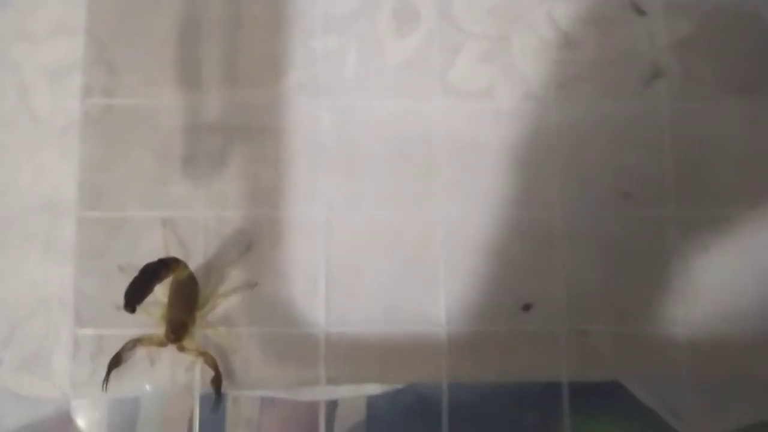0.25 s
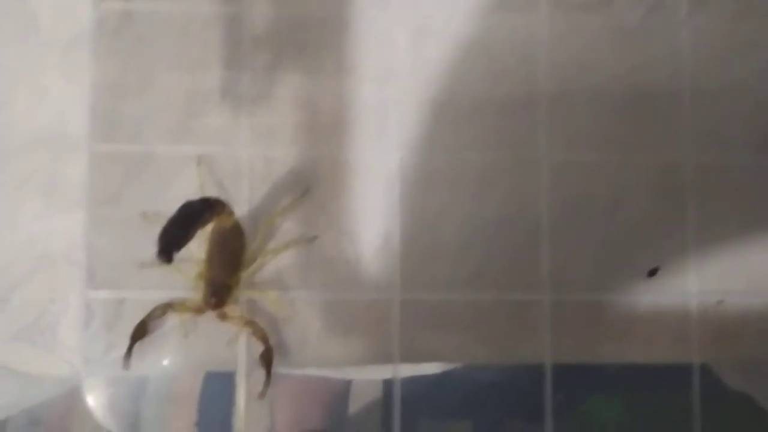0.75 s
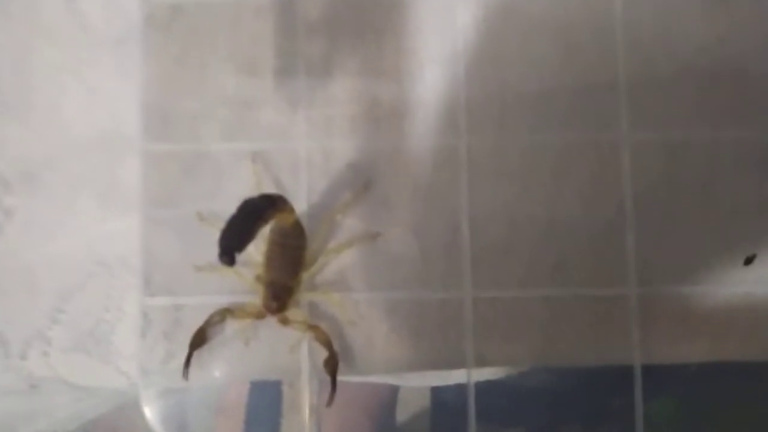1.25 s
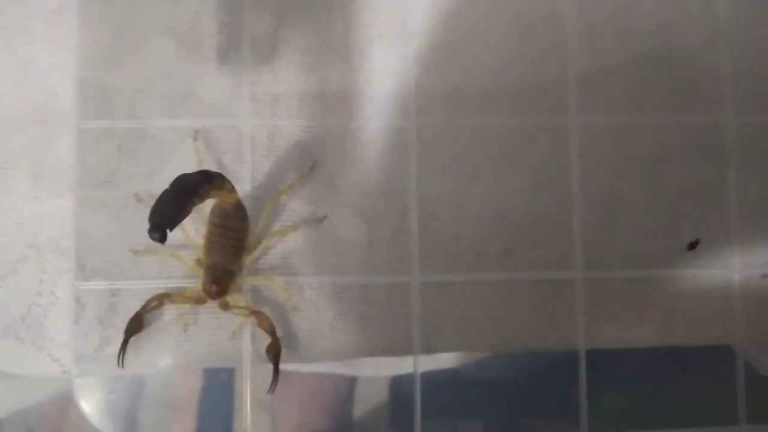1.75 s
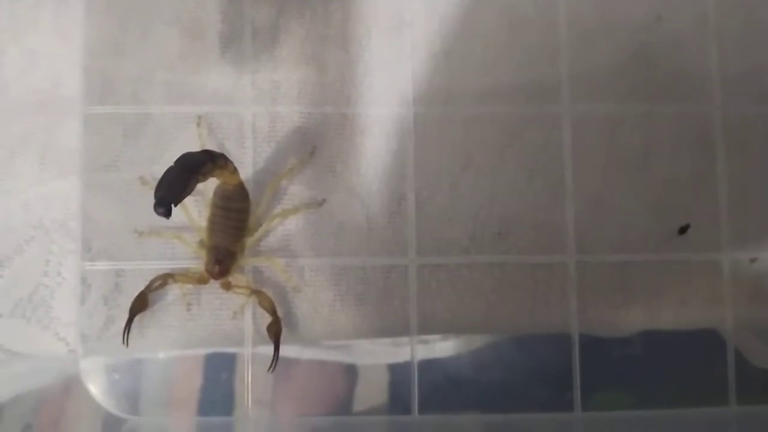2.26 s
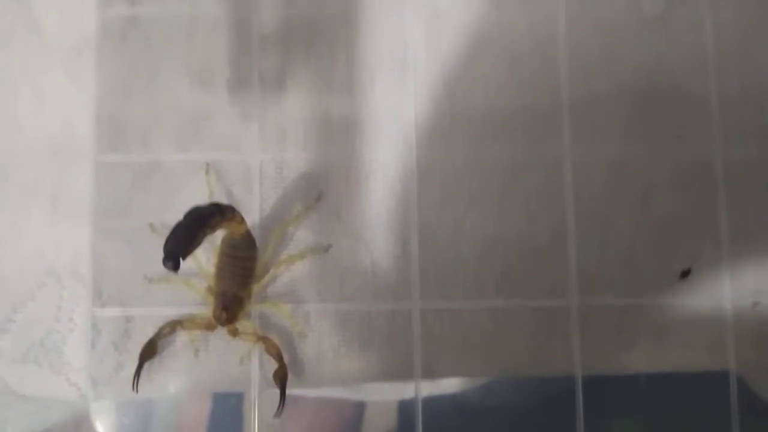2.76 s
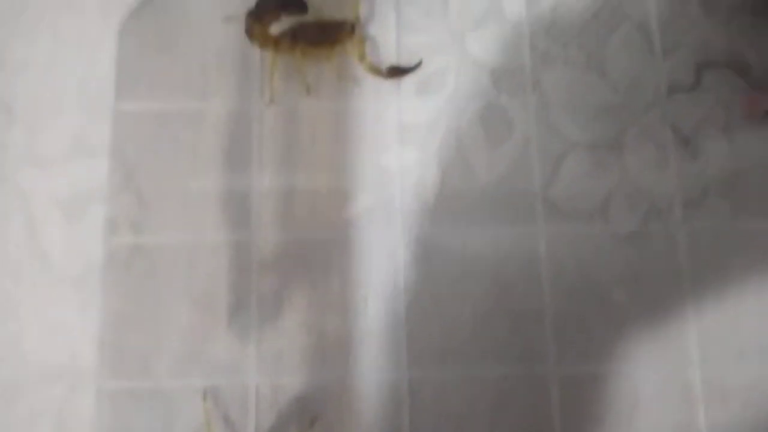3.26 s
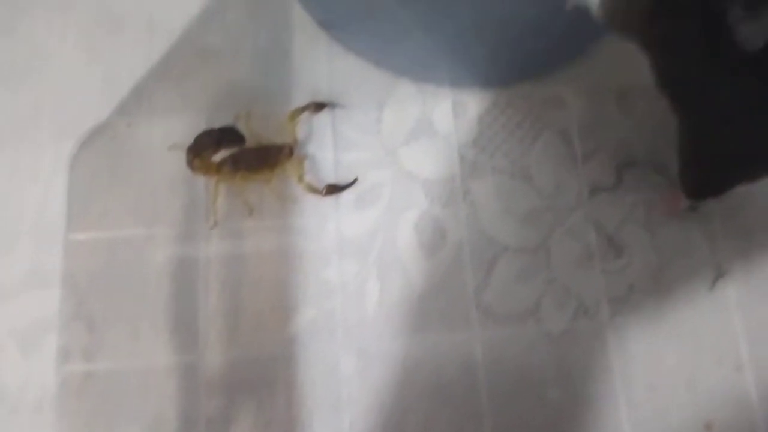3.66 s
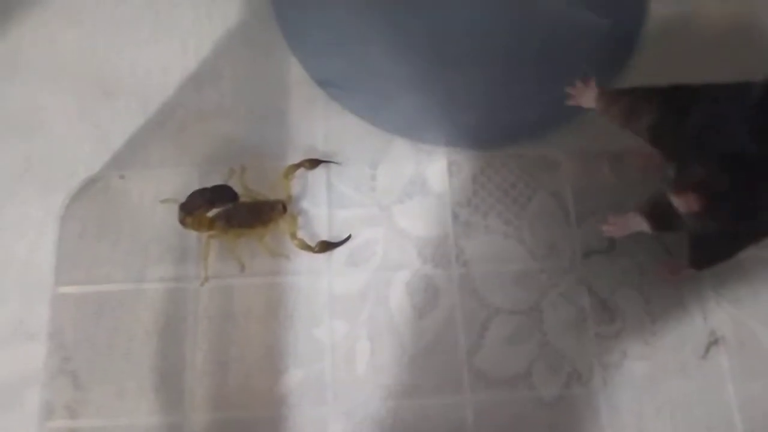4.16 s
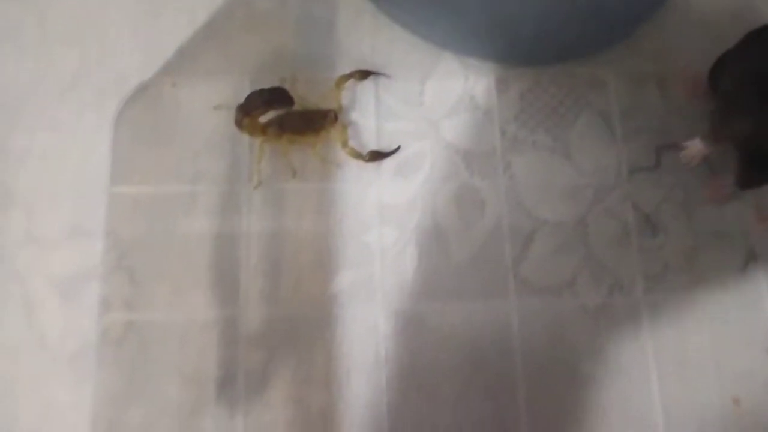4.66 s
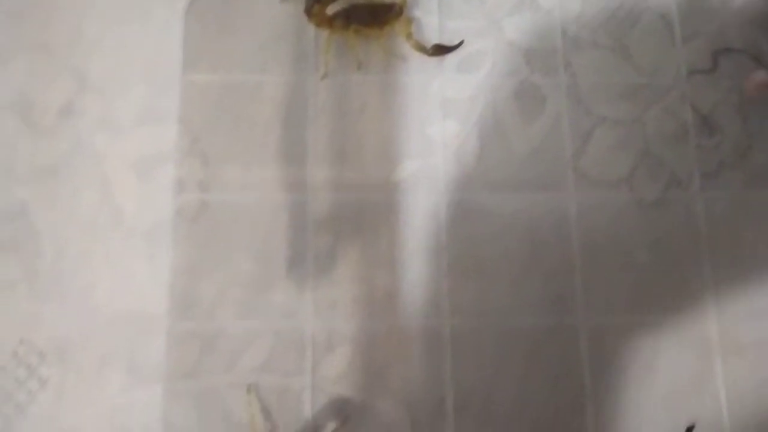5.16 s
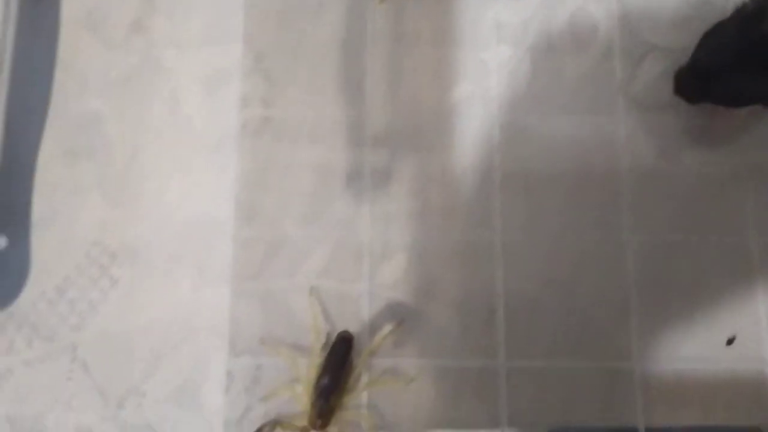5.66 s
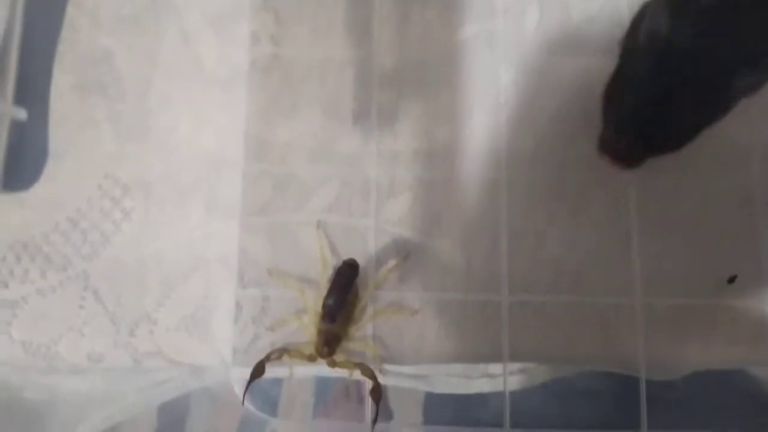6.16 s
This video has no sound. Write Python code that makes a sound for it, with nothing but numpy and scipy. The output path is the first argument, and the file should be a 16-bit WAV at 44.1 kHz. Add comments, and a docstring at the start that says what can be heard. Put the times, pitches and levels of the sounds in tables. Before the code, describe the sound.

Close inside a thin plastic box, a small rodent pads about with dull, hollow footfalls, fine claw scratching and brief gritty scrapes. After a little over three busy seconds it thins, then a tight cluster of bright, hard knocks cracks and clatters. Faint squeaky claw slides and soft brushes follow, with one firm creaking thump and a few weak steps. Handling rumble stays low underneath, in a small room.

```python
"""In a thin plastic storage box, close under a hand-held camera, a small rodent moves about.
Paws thump the floor with bending waves and damped modes; hard blows add a crack and a dense clatter.
Claws tick, creak and squeak, and shaped noise makes scrapes, rubbing and brushes.
The box rings, a small room answers, the floor flexes, and the hand on the camera rumbles faintly."""
import sys
import numpy as np
from scipy import signal
from scipy.fft import rfft, irfft, next_fast_len
from scipy.io import wavfile
from scipy.ndimage import map_coordinates

SR = 44100
rng = np.random.default_rng(int(sys.argv[2]) if len(sys.argv) > 2 else 0)


def file_out(sig):
    """Save sig as 16-bit WAV at sys.argv[1]."""
    # one column per channel
    cols = np.atleast_2d(sig).T
    # limit, then scale
    lim = np.clip(cols, -1, 1)
    pcm = np.round(lim * 32767).astype(np.int16)
    wavfile.write(sys.argv[1], SR, pcm)


N = 282681
T = np.arange(SR // 4) / SR  # the life of one contact [s]

# firm footfalls: (time [s], floor pitch [Hz], thud level [dB], knock over thud [dB], rap over thud [dB],
# relative strength of the sinking tail [dB], pat pitch [Hz], tap pitch [Hz],
# left minus right of pat and walls [dB], ahead of the balance of all steps)
FOOTFALLS = [(0.091, 311, -55, -14, -12.5, -14, 537, 1270, -5),
             (0.156, 269, -57, -9, -18, 2, 767, 1140, -1),
             (0.268, 281, -35.5, -12.5, -21, -7.5, 696, 1690, -0.5),
             (0.342, 280, -45.5, 0, -9.5, -1.5, 853, 1130, 0),
             (0.615, 293, -51, -11, -20.5, -9, 600, 1700, 1), (0.685, 260, -71, 6.5, 2, -1, 550, 1490, 8),
             (0.71, 240, -70.5, -3, 11, -5, 956, 1500, 6), (0.739, 197, -63, -4, 5, -1, 890, 1260, 3),
             (0.765, 278, -57, -8, -27, -5, 696, 2030, -2),
             (0.93, 227, -59.5, -2, -7.5, -2, 570, 1350, 1.7),
             (1.042, 290, -65.5, 1, -10, -5, 740, 1150, 3), (1.125, 286, -65.5, 7, -1.5, -15, 573, 1280, 1),
             (1.241, 258, -52, -17, -24, -7, 850, 1140, 2), (1.26, 285, -58.5, -6, -13, -8, 846, 1130, -2),
             (1.469, 255, -60, 6.5, 0.5, -3, 727, 1140, 1),
             (1.499, 162, -45.5, -13, -16, -3.5, 604, 1130, -1), (1.535, 220, -65, 1, -9, -7, 720, 1120, 4),
             (1.62, 271, -47.5, -8, -13, -5, 860, 1130, -2), (1.701, 272, -61, -5, -7, 8, 890, 1110, 7),
             (1.749, 339, -44.5, -2.5, -27, -6, 580, 1710, 1),
             (1.894, 286, -54.5, 4.5, -17, -5, 732, 1150, -0.5),
             (1.996, 286, -63, -3, -8, 4, 555, 1170, -0.9), (2.229, 344, -41, 0.5, -14, -11, 582, 1260, 0),
             (2.325, 260, -60, -9, -16, -3, 610, 1200, -2), (2.467, 214, -61, -0.5, -9, 1, 740, 1240, -2),
             (2.541, 209, -48, -22, -18.5, 4, 540, 1200, -5),
             (2.681, 337, -41, -1, -16.5, -6, 834, 1330, -1.5),
             (2.718, 250, -41, -6, -22.5, -3, 700, 1130, 0),
             (2.889, 196, -44.5, -10, -23, 0, 724, 1370, -0.5),
             (3.055, 204, -53.5, -11, -11, 4, 705, 1360, 4), (3.137, 295, -57, 0, -3, -2, 778, 1140, 3.5),
             (3.19, 302, -61, -2, -12, 0, 705, 1160, 2.3), (3.253, 228, -47.5, 6, -5, 6, 713, 1250, 5),
             (3.302, 165, -48.5, -19, -19.5, -16, 543, 1120, -2.5),
             (3.443, 243, -56.5, 0, -14, 1, 720, 1580, 0),
             (3.506, 192, -46, -13, -16.5, 2.5, 538, 1120, -2),
             (3.604, 258, -59, -3.5, -1.5, 21, 570, 1270, -0.3),
             (3.662, 192, -55.5, -8.5, -7, 1, 530, 1190, -0.5),
             (3.991, 303, -51, -2.5, -3, -10, 840, 1280, -3),
             (4.964, 213.4, -37, -7.5, -19.5, -5, 840, 1293, -1),
             (5.38, 293, -57.5, -18, -21, -5, 896, 1350, 4), (5.44, 165, -62.5, -18, -25, 3, 590, 1424, -4),
             (5.742, 289.5, -71, 2.5, -6, -6, 748, 1436, 7),
             (5.858, 203, -52, -10.5, -15, -4, 680, 1146, 2),
             (5.944, 372, -63, -7.5, -14, -5, 587, 1150, 0),
             (6.126, 266.2, -57.5, -11.5, -15, -6, 704, 1437, 4),
             (6.221, 286, -72.5, 1, -2, -8, 737, 1658, 0.8), (6.401, 223, -76.5, 5.5, 13, -3, 609, 1176, 1)]
# how busily the animal rubs along the plastic: (time [s], activity [dB])
ACTIVITY = [(0, 0.5), (0.11, 6), (0.5, -1), (0.82, 5), (1.0, -3.5), (1.38, 6), (1.87, 5.5), (2.05, 2),
            (2.3, -2), (2.96, -0.5), (3.12, 7), (3.3, -4), (3.5, 2), (3.95, 5), (4.2, -3), (4.64, -2.5),
            (5.0, -3.5), (6.41, -6.5)]
# a dragged foot, levels ahead of each layer's own offset: (time [s], length [s], body [dB], hiss [dB])
SCRAPES = [(0.15, 0.068, -62, -68), (0.208, 0.13, -62.5, -70.5), (0.329, 0.096, -60, -59.5),
           (0.677, 0.13, -61.5, -62.5), (0.915, 0.079, -80, -68), (1.18, 0.054, -64, -63),
           (1.431, 0.08, -68, -58), (1.493, 0.095, -74, -58.5), (1.855, 0.12, -68, -74),
           (2.041, 0.02, -62, -81), (3.018, 0.078, -70, -52.5), (3.192, 0.059, -81, -67.5),
           (3.782, 0.035, -54, -61.5), (3.991, 0.041, -57, -79), (5.352, 0.041, -88.5, -70.5)]
# noise colours of the flexing floor, the low scuff and the bright hiss: (frequency [Hz], relative level [dB])
FLEX = [(20, -28), (50, -14.5), (85, 0), (130, 0), (200, -0.5), (330, -2.5), (450, -10.5), (800, -11.5),
        (1200, -30), (2500, -48), (5000, -120)]
SCUFF = [(100, -38.5), (400, -20), (800, 0.5), (1500, -0.5), (2500, -2.5), (4000, -9), (5500, -9),
         (8000, -11.5), (12000, -50.5)]
HISS = [(3000, -14.5), (5500, -16.5), (7000, -10.5), (8300, -6), (9500, 0.5), (11000, -5), (11900, -12.5),
        (14000, -18), (16000, -23)]


def amp(db):
    """The decibel law: level to amplitude ratio."""
    return 10 ** (np.asarray(db) / 20)


def unit(x):
    """Normalisation of power: scaled to rms 1."""
    return x / np.sqrt(np.mean(x ** 2) + 1e-20)


def head_unit(x, size):
    """Normalisation of onset power: the first size samples have rms 1."""
    return x / np.sqrt(np.mean(x[..., :size] ** 2) + 1e-20)


def along(points, hz):
    """Logarithmic frequency scale: (frequency, value) points read at hz."""
    f, v = np.transpose(points)
    return np.interp(np.log(hz + 1), np.log(f), v)


def curves(rows):
    """Linear interpolation in time: one value per sample for each column after the time."""
    s, *cols = np.transpose(rows)
    return [np.interp(np.arange(N) / SR, s, c) for c in cols]


def wobble(rate):
    """Slow random modulation: a smooth curve through rate random knots a second."""
    knots = rng.standard_normal(int(N * rate / SR) + 4)
    return map_coordinates(knots, [np.arange(N) * rate / SR])


def fade(t60, t=T):
    """Exponential damping: the level loses 60 dB in t60 seconds."""
    return np.exp(-np.log(1000) * t / t60)


def swell(length, skew=1):
    """Amplitude envelope: half a sine over length seconds, peaking early when skew is below 1."""
    return np.sin(np.pi * np.clip(T / length, 0, 1) ** skew)


def swept(hz):
    """Frequency modulation: phase is the running sum of the momentary frequency."""
    return np.sin(2 * np.pi * np.cumsum(hz) / SR)


def add(track, s, sound):
    """Superposition: mix a sound into the track at time s."""
    part = track[:, max(0, round(s * SR)):][:, :sound.shape[-1]]
    part += sound[..., :part.shape[-1]]


def panned(x, db):
    """Level difference between the ears: the left side db louder than the right."""
    return x * amp(np.array([[.5], [-.5]]) * db)


def noise(spectrum, size=N):
    """Partial coherence: stereo noise of rms 1 whose mid and side shares vary with frequency."""
    # left-right likeness: (frequency [Hz], coherence [0 to 1])
    alike = [(50, .88), (300, .9), (600, .45), (1200, 0), (2500, 0), (5000, .15), (10000, .3)]
    m = next_fast_len(size)
    hz = np.fft.rfftfreq(m, 1 / SR)
    turn = np.arccos(np.clip(along(alike, hz), -1, 1)) / 2
    coloured = rfft(rng.standard_normal((2, m))) * amp(along(spectrum, hz))
    mid, side = irfft(coloured * [np.cos(turn), np.sin(turn)], m)
    return unit(np.array([mid + side, mid - side])[:, :size])


def echoes(decay):
    """Diffuse reverberation: dense reflections, each frequency dying at its own speed."""
    hz, t, z = signal.stft(noise([(1, 0)], size=len(T)), SR, nperseg=128)
    return signal.istft(z * fade(along(decay, hz)[:, None], t), SR, nperseg=128)[1][:, :len(T)]


def ring(hz, t60, lag=0):
    """A damped mode; path difference brings it to the left lag seconds after the right."""
    t = np.maximum(T - np.array([[lag], [-lag]]) / 2 - abs(lag) / 2, 0)
    return np.sin(2 * np.pi * hz * t) * fade(t60, t)


def soft(x, hz):
    """Contact duration: a padded contact lasts longer, which dulls it above hz."""
    return signal.sosfilt(signal.butter(2, hz, fs=SR, output="sos"), x)


def box(vary_db, dense_db, lag_spread=0.00039, rise=0.00032):
    """Modal superposition: each strike gives the modes new strengths, signs and delays, over dense echoes."""
    # ringing of the box: (frequency [Hz], relative level [dB], t60 [s])
    modes = [(146, -14, 0.11), (212, -9, 0.17), (333, 0, 0.093), (393, -4, 0.055), (568, -8.5, 0.07),
             (665, -5, 0.14), (760, -0.5, 0.1), (842, 1, 0.058), (945, -7, 0.062), (1125, -6.5, 0.053),
             (1261, -2, 0.08), (1451, -1, 0.052), (1540, -7.5, 0.082), (1726, -5.5, .08), (1884, -6, 0.04),
             (1970, -5.5, 0.05), (2130, -4.5, 0.045), (2143, -5, 0.08), (2302, -7, 0.041),
             (2540, -13, 0.11), (2690, -10, 0.09), (2900, -9.5, 0.066), (3878, -17.5, .07),
             (4428, -15.5, .06)]
    # decay of its dense echoes: (frequency [Hz], t60 [s])
    decay = [(200, 0.12), (1000, 0.059), (2500, 0.06), (5000, 0.077), (10000, 0.02)]
    wide_from_hz = 490  # longer waves reach both microphones nearly in step
    struck = 0
    for hz, db, t60 in modes:
        side, size, way = rng.standard_normal(3)
        lag = lag_spread * way * min(1, hz / wide_from_hz) ** 2
        struck = struck + np.sign(side) * amp(db + vary_db * size) * ring(hz, t60, lag)
    return (struck + amp(dense_db) * echoes(decay)) * (1 - np.exp(-T / rise))


def voiced(blow, levels_db):
    """Contact stiffness: hardness sets how strongly each register sounds in its first 20 ms."""
    # thud, knock, rap, snap and crack: (low edge [Hz], high edge [Hz])
    registers = [(90, 450), (450, 1100), (1100, 3200), (3200, 6000), (6000, 15000)]
    total = 0
    for db, edges in zip(levels_db, registers):
        band = signal.sosfilt(signal.butter(4, edges, "band", fs=SR, output="sos"), blow)
        total = total + amp(db) * head_unit(band, size=882)
    return total


def resounding(x, ring_db=-14):
    """Forced vibration: friction keeps the modes of the box ringing, by convolution."""
    answer = box(vary_db=-1.0, dense_db=-11.5)
    return x + amp(ring_db) * signal.fftconvolve(x, answer / np.linalg.norm(answer[0]), axes=1)[:, :N]


def hand_rumble(sway_db=1.0):
    """Structure-borne sound: the hand on the camera makes a low, swaying noise."""
    # the hand on the camera: (time [s], rumble level [dB])
    hand = [(0, -54.5), (0.35, -52.5), (0.6, -55), (2.8, -57), (3.07, -48.5), (3.5, -54), (3.95, -52),
            (4.2, -57), (6.41, -57.5)]
    # its colour: (frequency [Hz], relative level [dB])
    rumble = [(10, -7), (18, 9), (40, -0.5), (70, -8), (110, -16), (160, -43.5), (260, -120)]
    level_db, = curves(hand)
    return amp(level_db + sway_db * wobble(9.9)) * noise(rumble)


def floor_flex(flex_db=-66.5, grows=0.4, lumpy_db=1.0):
    """Plate flexure: low noise of the floor grows by 0.4 dB per dB of activity."""
    activity, = curves(ACTIVITY)
    return amp(flex_db + grows * activity + lumpy_db * wobble(24)) * noise(FLEX)


def floor_quiver(quiver_db=-18, quiver_t60=0.28):
    """Transient plate response: dull noise rises and dies after each firm footfall."""
    quiver, t = np.zeros((2, N)), np.arange(SR) / SR
    shape = fade(quiver_t60, t) * (1 - fade(0.036, t))
    for s, hz, weight_db, *touch in FOOTFALLS:
        add(quiver, s, amp(weight_db + quiver_db) * shape)
    return quiver * unit(soft(noise(FLEX), 180))


def rubbing(body_db=-74, hiss_db=-75.5, body_grows=0.41, grain_db=0.73):
    """Friction noise: scuff and hiss share uneven grains, which clump when the animal is busy."""
    activity, = curves(ACTIVITY)
    clump_db = np.clip(1 + .3 * activity, 0, 2.5) * wobble(90)
    grain = unit(amp(grain_db * wobble(350) + clump_db))
    # the low scuff grows more slowly with activity than the hiss
    body = amp(body_db + body_grows * activity) * noise(SCUFF)
    hiss = amp(hiss_db + activity) * noise(HISS)
    return grain * (body + hiss)


def scratching(size_db=4, pitch_spread=.45, cycles=14, lag=0.00038):
    """Impulse excitation: very light claw catches each ring the plastic for a few cycles."""
    ticks_per_s, tick_hz = 70, 1609
    tick_db, grows = -73.5, 0.58  # level at zero activity, and dB per dB of activity
    track = np.zeros((2, N))
    activity, = curves(ACTIVITY)
    count = int(ticks_per_s * N / SR)
    draws = np.clip(rng.standard_normal((count, 3)), -2, 2)
    for at, (size, spot, way) in zip(rng.integers(N, size=count), draws):
        hz = tick_hz * np.exp(pitch_spread * spot)
        level_db = tick_db + grows * activity[at] + size_db * size
        add(track, at / SR, amp(level_db) * ring(hz, cycles / hz, lag * way))
    return track


def footfalls(activity_share=0.3, pitch_spread=0.084, unevenness=0.16):
    """Jittered periodicity: firm footfalls plus light, uneven steps that follow the activity."""
    walk_from_s, walk_to_s, steps_per_s = 0.13, 3.3, 3.4
    light_db, light_hz = -69, 267  # level at zero activity, central floor pitch
    # one light step: (knock over thud [dB], rap over thud [dB], sinking tail [dB], pat [Hz], tap [Hz],
    # left minus right of pat and walls [dB])
    touch = (-2.5, -27.5, -4, 749.5, 1209, 1)
    beats = np.arange(walk_from_s, walk_to_s, 1 / steps_per_s)
    late, spot = rng.standard_normal((2, len(beats)))
    times = beats + unevenness * late / steps_per_s
    weights = light_db + activity_share * np.interp(times, *np.transpose(ACTIVITY))
    pitches = light_hz * np.exp(pitch_spread * spot)
    return FOOTFALLS + [(s, hz, db, *touch) for s, hz, db in zip(times, pitches, weights)]


def bending_wave(start_hz=440, end_hz=100, sink_s=.017, peak_s=.016, scatter_db=-5, scatter_t60=0.19):
    """Dispersion: long bending waves arrive later, so a thump sinks; walls scatter it into a low tail."""
    hz = end_hz + (start_hz - end_hz) * np.exp(-T / sink_s)
    spot = np.exp(.1 * rng.standard_normal())  # shifts the whole sweep
    wave = swept(hz * spot) * (T / peak_s * np.exp(1 - T / peak_s)) ** 2
    tail = fade(scatter_t60) * (1 - np.exp(-T / peak_s))
    scattered = unit(soft(noise(FLEX, size=len(T)), 330)) * tail
    return wave + amp(scatter_db) * 2 * scattered


def paws(floor_db=6, floor_t60=0.071, pat_db=6, pat_t60=0.04, tap_db=5, tap_t60=0.016,
         sag_db=-1, pad_hz=1700, lag=0.0003, walls_db=-5, landing_s=0.00078, snap_db=-18):
    """Soft impact: a padded paw sets damped floor modes swinging and shakes the walls."""
    track = np.zeros((2, N))
    landing = 1 - np.exp(-T / landing_s)
    for s, hz, weight_db, knock_db, rap_db, tail_db, pat_hz, tap_hz, pan_db in footfalls():
        delay = lag * rng.standard_normal()
        floor = amp(floor_db) * ring(hz, floor_t60) + amp(sag_db + tail_db) * bending_wave()
        pat = amp(pat_db) * ring(pat_hz, pat_t60, delay) + amp(tap_db) * ring(tap_hz, tap_t60, delay)
        walls = amp(walls_db) * box(vary_db=3.0, dense_db=8.0)
        step = soft(landing * (floor + panned(pat + walls, pan_db)), pad_hz)
        levels_db = weight_db + np.array([0, knock_db, rap_db, rap_db + snap_db])
        add(track, s, voiced(step, levels_db))
    return track


def claws(t60=0.009, tail_db=-20, tail_t60=0.064, body_db=-9, paw_claw_db=-9.5):
    """Broadband impulse: a catching claw tip gives a tiny bright burst with some body and a short echo."""
    # claw tips catching on their own: (time [s], level [dB])
    catching = [(0.096, -63.5), (0.177, -67), (0.341, -40), (0.374, -49.5), (0.711, -62), (0.737, -59.5),
                (0.806, -57.5), (0.872, -66), (0.921, -61.5), (1.181, -60.5), (1.445, -67), (1.471, -64.5),
                (1.496, -49.5), (1.535, -58), (2.045, -64), (2.23, -65.5), (2.874, -66.5), (3.763, -54),
                (3.799, -56.5), (4.031, -60.5), (4.084, -60.5), (4.178, -61.5), (4.192, -63)]
    track = np.zeros((2, N))
    attack = 1 - np.exp(-T / .0005)
    shape = (fade(t60) + amp(tail_db) * fade(tail_t60)) * attack
    # claws also touch with each firm footfall, below its rap
    with_paws = [(s, weight_db + rap_db + paw_claw_db)
                 for s, hz, weight_db, knock_db, rap_db, *rest in FOOTFALLS]
    for s, db in catching + with_paws:
        burst = noise(HISS, size=len(T)) + amp(body_db) * noise(SCUFF, size=len(T))
        add(track, s, amp(db) * head_unit(shape * burst, size=353))  # level over the first 8 ms
    return track


def scrapes(hiss_db=-1, grain_db=-2.5, catch_db=2.9):
    """Stick-slip friction: a dragged foot catches and lets go many times in a quick, gritty swell."""
    drag = np.zeros((2, N))  # body and hiss envelopes
    for s, length, *levels_db in SCRAPES:
        add(drag, s, amp(levels_db)[:, None] * swell(length, 0.5))
    grain = amp(grain_db * wobble(700) + catch_db * wobble(110))
    # only the firmer catches shake the plastic, so the low part is grittier
    grit = grain * amp(3 * wobble(260))
    body = drag[0] * unit(grit * noise(SCUFF))
    return body + amp(hiss_db) * drag[1] * unit(grain * noise(HISS))


def catches(body_db=3, hiss_db=9, body_hz=1150, hiss_hz=8600, body_t60=0.0089, hiss_t60=0.00073,
            lag=0.00017, catches_per_s=150):
    """Stick-slip impulses: each snag within a scrape gives a tiny snap and a short ring of the plastic."""
    track = np.zeros((2, N))
    for s, length, low_db, high_db in SCRAPES:
        count = int(catches_per_s * length)
        draws = np.clip(rng.standard_normal((count, 4)), -2, 2)
        for u, (size, low, high, way) in zip(rng.beta(1.5, 2.5, count), draws):
            body = amp(low_db + body_db) * ring(body_hz * np.exp(0.34 * low), body_t60, lag * way)
            snap = amp(high_db + hiss_db) * ring(hiss_hz * np.exp(.12 * high), hiss_t60)
            add(track, s + u * length, amp(5.5 * size) * (body + snap))
    return track


def creaks(t60=0.023, rise=0.0022, lag=0.000097):
    """Resonance: a sliding or pressing claw sets one narrow mode of the floor going for a moment."""
    # thin creaks of the floor: (time [s], level [dB], pitch [Hz])
    creaking = [(0.708, -38, 1510), (0.738, -46, 1560), (2.001, -51, 1310), (2.54, -39.5, 1260),
                (2.888, -46, 2370), (3.505, -45, 1285), (4.965, -35.5, 1933), (5.858, -48.5, 1832),
                (6.221, -59, 1560)]
    track = np.zeros((2, N))
    for s, db, hz in creaking:
        add(track, s, amp(db) * ring(hz, t60, lag) * (1 - np.exp(-T / rise)))
    return track


def shifts(level_db=1, waver=0.074, overtone_db=-13):
    """Load-dependent resonance: shifting weight swings the sheet in its deepest mode, which glides."""
    # weight shifting, level ahead of level_db: (time [s], length [s], level [dB], start [Hz], end [Hz])
    loads = [(0.913, 0.083, -56.5, 97, 84), (1.5, 0.048, -42, 136.5, 95.5), (5.429, 0.14, -55, 83.8, 67.8),
             (5.533, 0.095, -58, 73.5, 55), (5.596, .09, -53.5, 75.7, 85), (5.719, 0.064, -54.5, 52, 48),
             (5.766, 0.12, -56, 78, 89)]
    track = np.zeros((2, N))
    for s, length, db, start_hz, end_hz in loads:
        glide = start_hz + (end_hz - start_hz) * np.clip(T / length, 0, 1)
        hz = glide * (1 + waver * wobble(35)[:len(T)])
        tone = swept(hz) + amp(overtone_db) * swept(2 * hz)
        add(track, s, amp(level_db + db) * swell(length, 0.93) * tone)
    return track


def slides(width_hz=950):
    """Frictional squeal: a sliding claw sings in a rough band that falls as it slows."""
    # claws sliding: (time [s], length [s], level [dB], start [Hz], end [Hz])
    sliding = [(1.778, .045, -55.5, 12960, 11080), (1.808, 0.078, -63.5, 10550, 8000),
               (4.48, 0.055, -66, 10670, 9700), (4.526, 0.049, -65, 9004, 7100),
               (4.669, 0.042, -57, 9570, 7990), (4.712, 0.059, -67, 7520, 6220),
               (4.755, .055, -71.5, 6800, 5940)]
    track = np.zeros((2, N))
    roughness = [(width_hz / 2, 0), (width_hz, -6), (3 * width_hz, -18), (10 * width_hz, -45)]
    for s, length, db, start_hz, end_hz in sliding:
        hz = start_hz + (end_hz - start_hz) * np.clip(T / length, 0, 1)
        squeak = unit(noise(roughness, size=len(T)) * swept(hz))
        add(track, s, amp(db) * swell(length, 0.8) * squeak)
    return track


def singing(waver=0.014):
    """Light damping: one mode of the box goes on faintly after some steps, swelling and fading."""
    # singing modes: (time [s], length [s], level [dB], central pitch [Hz])
    tones = [(3.138, 0.11, -57.5, 328), (3.363, 0.14, -58.5, 328), (6.023, 0.13, -72.5, 705),
             (6.14, 0.153, -66.5, 328), (6.212, 0.064, -70, 728)]
    track = np.zeros((2, N))
    for s, length, db, pitch_hz in tones:
        hz = pitch_hz * (1 + waver * wobble(30)[:len(T)])
        add(track, s, amp(db) * swell(length) * swept(hz))
    return track


def wall_swing(hz, lag=0.00016, sharp=0.77, sink_s=.0008):
    """Dispersion: short bending waves of a blow arrive first, so the wall's few swings sink towards hz."""
    t = np.maximum(T - np.array([[lag], [0]]), 0)
    u = t * hz / 1.7  # the envelope peaks after 1.7 periods of hz
    bent = t + sharp * sink_s * (1 - np.exp(-t / sink_s))
    return np.sin(2 * np.pi * hz * bent) * (u * np.exp(1 - u)) ** 2


def knocks(wall_db=19, crack_db=21, crack_t60=0.014, crack_modes_db=1, tail_db=-27, tail_t60=0.078,
           bounce_db=-15, bounce_s=0.0062, crackle_db=3.0, clatter_t60=.055):
    """Hard impact: a ringing crack, a few stiff wall swings, then the dense modal clatter of the box."""
    # blows: (time [s], strength [dB], fullness [dB], 0 square on and negative glancing,
    # snap over usual [dB], final wall pitch [Hz], relative ring of the box [dB],
    # left minus right of wall and crack [dB])
    blows = [(3.7749, -42, -14, -0.5, 1860, 3.5, -2), (3.8548, -23, 5, 4, 1720, 6.5, -3),
             (3.8601, -28, -10, -3, 1050, -1.5, 7.5), (3.9034, -22, -24, 3, 1814, -4, 0.5),
             (3.9114, -39, -16.5, 1.5, 1700, 1.5, 3), (3.9181, -33.5, -18, -2, 1400, 4.5, -2.5),
             (3.9459, -45.5, -11, -18, 1450, 9, 2.5), (3.991, -47, -18, -1, 1980, 16, -5),
             (4.007, -53, -8.5, 4, 2100, -3, -2), (4.0392, -26.5, -27, 3.5, 2010, -3.5, -3)]
    # each register: (level over strength when square on [dB], share of the fullness it follows [dB/dB])
    registers = [(-15, 0.4), (-10, 0.5), (-0.25, 0.07), (-17.5, 0.28), (-3, 1)]
    # high, stiff modes: (frequency [Hz], relative level [dB], t60 [s])
    stiff_modes = [(7100, -5.5, .005), (7826, -6.5, 0.0041), (8976, -7.5, .014), (9760, -4, 0.011),
                   (11040, -2, .005)]
    # colours of the bright crack and of the rattled weak modes: (frequency [Hz], relative level [dB])
    crack_colour = [(500, -24), (3200, -14), (4000, -1), (4600, -3.5), (5600, -5), (6600, -0.5),
                    (8200, 0.5), (9400, 6.5), (11000, -2.5), (12500, -13.5), (15000, -29.5)]
    clatter_colour = [(150, -9), (350, -3.5), (520, -7.5), (850, 1), (1400, 2), (1700, -2.5), (2100, -3),
                      (3000, -10), (4300, -19), (7000, -30), (12000, -49.5)]
    track = np.zeros((2, N))
    attack = 1 - np.exp(-T / .0004)
    for s, strength_db, fullness_db, snap_db, wall_hz, ring_db, pan_db in blows:
        levels_db = np.array([strength_db + db + share * fullness_db for db, share in registers])
        levels_db = levels_db + [0, 0, 0, snap_db, 0]
        wall = amp(wall_db) * wall_swing(wall_hz)
        crackle = amp(tail_db + crackle_db * wobble(448.1)[:len(T)]) * fade(tail_t60)
        burst = (fade(crack_t60) + crackle) * noise(crack_colour, size=len(T))
        stiff = sum(amp(db) * ring(hz, t60, 2e-5 * rng.standard_normal()) for hz, db, t60 in stiff_modes)
        crack = amp(crack_db) * attack * (burst + amp(crack_modes_db) * stiff)
        rattle = amp(ring_db + 3 * np.tanh(wobble(350)[:len(T)]))
        dense = noise(clatter_colour, size=len(T)) * fade(clatter_t60) * attack
        clatter = 1.3 * box(vary_db=1.0, dense_db=-20) + 1.5 * dense
        blow = panned(wall + crack, pan_db) + rattle * clatter
        # a near wall throws the swing back with the sides exchanged
        add(blow, bounce_s, amp(bounce_db) * wall[::-1])
        add(track, s, voiced(blow, levels_db))
    return track


def brushes():
    """Smooth friction: fur slides along the plastic without snagging, in a soft, even swish."""
    # body brushing the plastic: (time [s], length [s], body [dB], hiss [dB])
    strokes = [(4.474, 0.15, -77, -70.5), (4.655, 0.068, -75, -65), (4.702, 0.087, -60.5, -63.5),
               (4.983, 0.057, -70, -76), (6.11, 0.079, -74, -82), (6.198, 0.11, -76, -87)]
    stroke = np.zeros((2, N))  # body and hiss envelopes
    for s, length, *levels_db in strokes:
        add(stroke, s, amp(levels_db)[:, None] * swell(length, 1.07))
    return stroke[0] * noise(SCUFF) + stroke[1] * noise(HISS)


def room(x, wet_db=-22):
    """Reverberation: the small room answers 10 ms after the direct sound."""
    # decay of the room: (frequency [Hz], t60 [s])
    decay = [(200, 0.62), (1500, 0.13), (5000, 0.15), (10000, 0.18)]
    tail = np.pad(echoes(decay), ((0, 0), (SR // 100, 0)))
    return amp(wet_db) * signal.fftconvolve(x, tail / np.linalg.norm(tail[0]), axes=1)[:, :N]


def scene():
    """Superposition: all contacts in the room, over the rubbing, the floor and the rumble."""
    steps = panned(paws(), 0.8) + panned(shifts(), 0.8) + singing()
    clawing = claws() + slides() + creaks() + resounding(scrapes() + catches() + scratching())
    contacts = steps + clawing + brushes() + knocks()
    movement = hand_rumble() + floor_flex() + floor_quiver()
    return contacts + room(contacts) + resounding(rubbing(), ring_db=-19.5) + movement


def record(dry):
    """Transduction: two microphones colour the sound, peaks saturate, and a band limit cuts the top."""
    # difference in colour of the microphones: (frequency [Hz], left minus right [dB])
    ports = [(300, 1.5), (800, -0.5), (1500, 0.5), (4000, 0), (7000, -1.5), (10000, -2), (12500, 4.5)]
    top_hz = 15750
    m = next_fast_len(N + SR // 2)
    hz = np.fft.rfftfreq(m, 1 / SR)
    heard = irfft(panned(rfft(dry, m), along(ports, hz)), m)
    held = heard / (1 + np.abs(heard / .92) ** 6) ** (1 / 6)  # rounds off peaks near full scale
    return irfft(rfft(held) * (hz < top_hz), m)[:, :N]


dry = scene()
out = record(dry)
file_out(out)
```